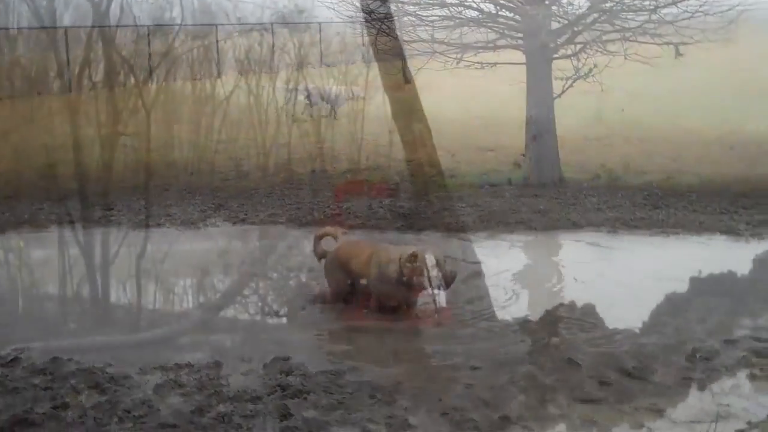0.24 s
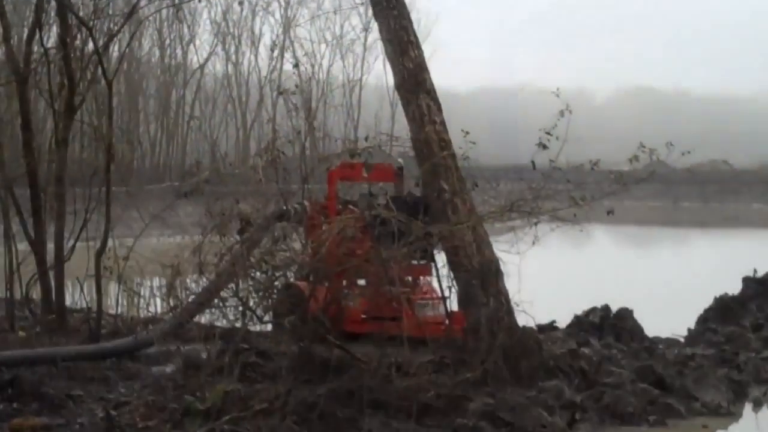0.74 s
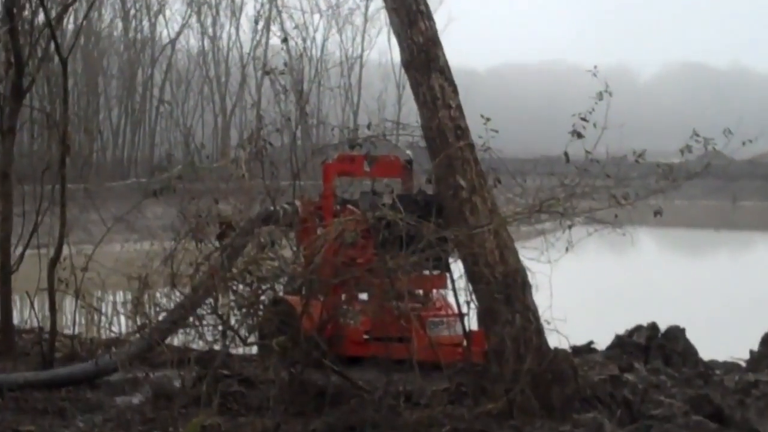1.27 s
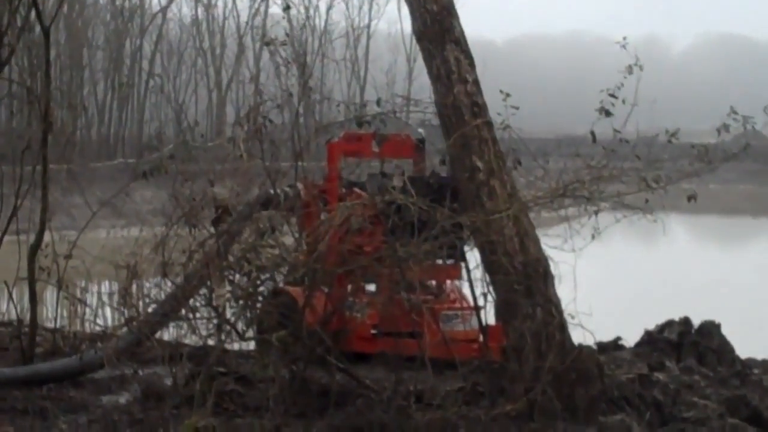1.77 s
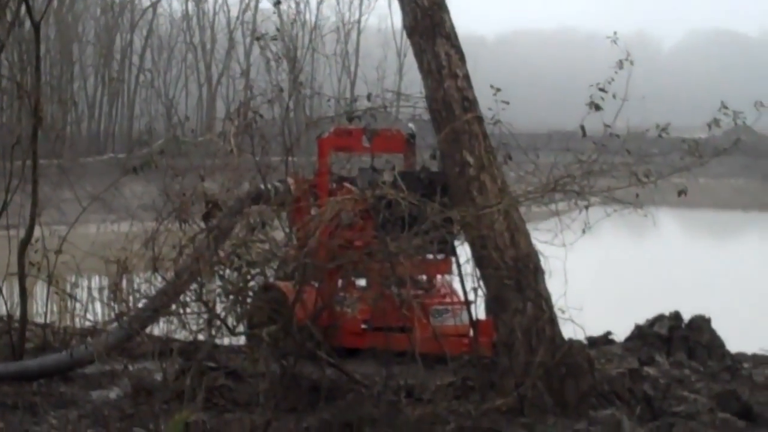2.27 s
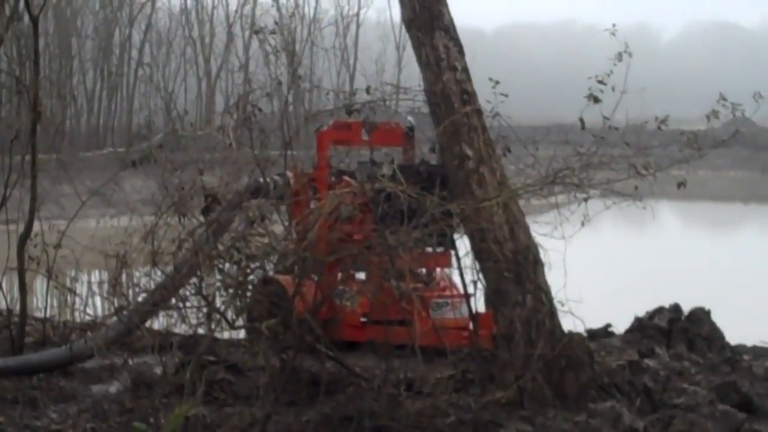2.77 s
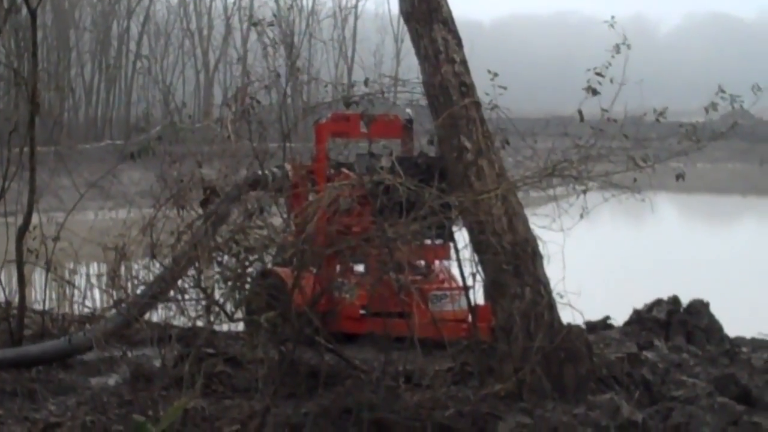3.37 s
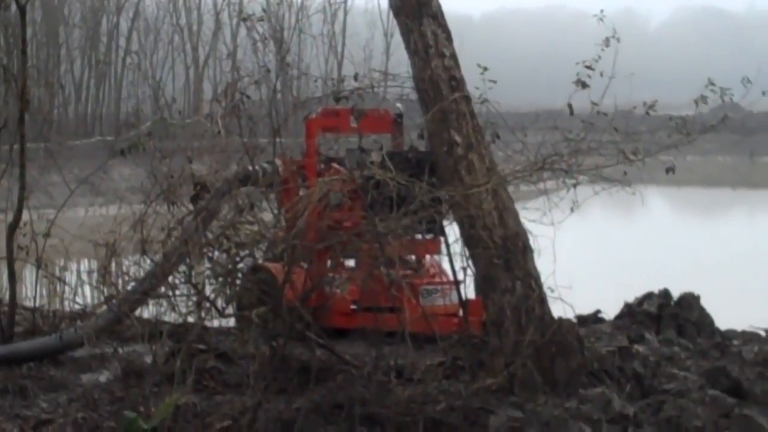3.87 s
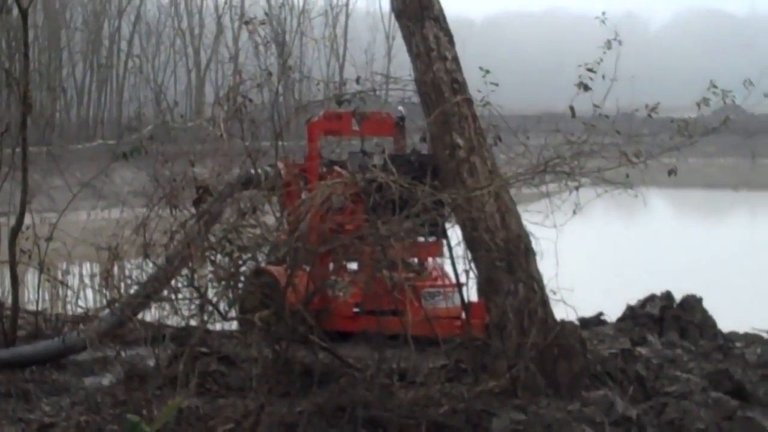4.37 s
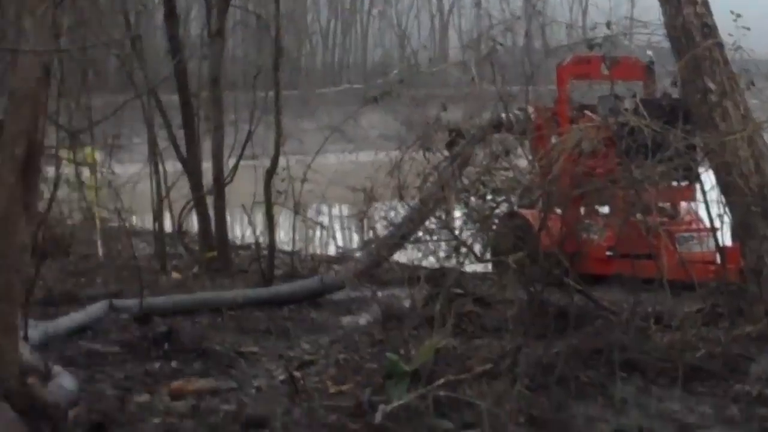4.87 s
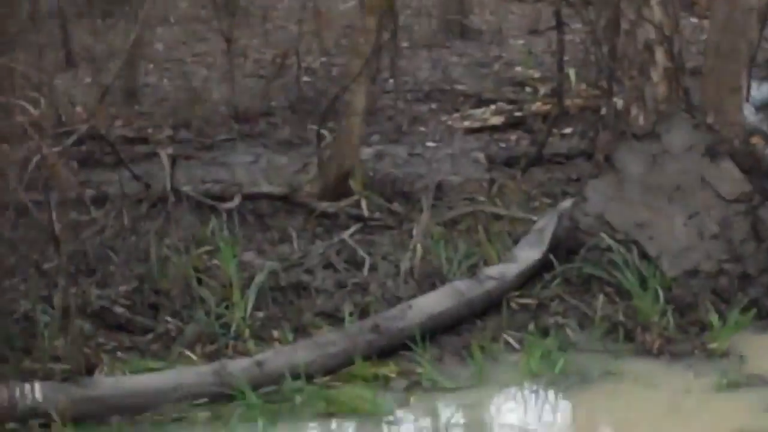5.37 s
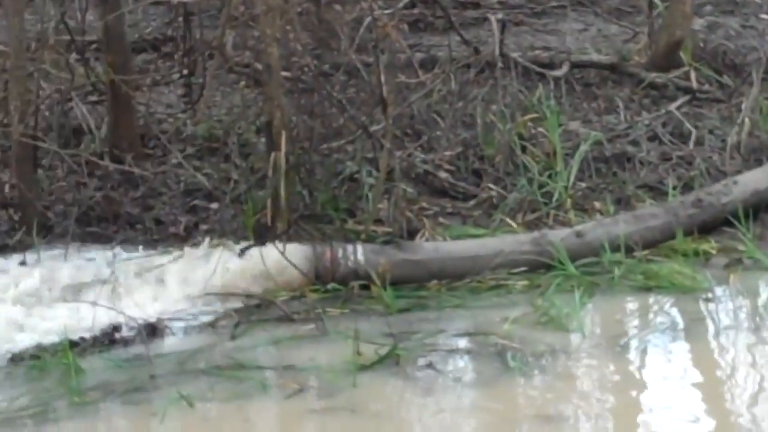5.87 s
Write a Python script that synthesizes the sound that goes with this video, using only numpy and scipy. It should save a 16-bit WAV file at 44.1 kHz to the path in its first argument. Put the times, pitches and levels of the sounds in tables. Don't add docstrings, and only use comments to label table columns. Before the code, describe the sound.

A quiet muddy puddle trickle dissolves into a clattering diesel pump beside a roaring, bubbling gush of water from a wide hose.

```python
import sys
import numpy as np
from scipy import signal
from scipy.fft import rfft, irfft, next_fast_len
from scipy.io import wavfile
from scipy.ndimage import uniform_filter1d

SR = 44100
rng = np.random.default_rng(int(sys.argv[2]) if len(sys.argv) > 2 else 0)


def wav_record(signal):
    frames = np.transpose(np.atleast_2d(signal))
    bounded = np.clip(frames, -1, 1)
    quanta = np.round(bounded * 32767).astype(np.int16)
    wavfile.write(sys.argv[1], SR, quanta)


def gain_from_db(level_db):
    decades = np.asarray(level_db, float) / 20
    return 10 ** decades


N = 270333

CYCLE_HZ, CYCLE_START = 7.9444, -.048
RIPPLE = rng.standard_normal(500)


def evened(x):
    return x / np.sqrt(np.mean(x ** 2) + 1e-20)


def read(points, hz):
    f, value = np.transpose(points)
    return np.interp(np.log(hz + 1), np.log(f + 1), value)


def add(mix, s, sound):
    part = mix[max(round(s * SR), 0):][:len(sound)]
    part += sound[:len(part)]


def coloured(x, db_of_hz):
    size = next_fast_len(len(x), real=True)
    gain = gain_from_db(db_of_hz(np.fft.rfftfreq(size, 1 / SR)))
    return irfft(rfft(x, size) * gain, size)[:len(x)]


def wander(rate_hz):
    steps = rng.standard_normal(int(N / SR * rate_hz) + 2)
    return evened(np.interp(np.arange(N) / SR * rate_hz, np.arange(len(steps)), steps))


def wash(spectrum, patchy_db, swell_db):
    frames = N // 128 + 5
    a, b, patches = rng.standard_normal((frames, 257, 3)).T
    patches = uniform_filter1d(patches, size=5, axis=0)
    patches = evened(uniform_filter1d(patches, size=12, axis=1))
    z = (a + 1j * b) * gain_from_db(patchy_db * patches)
    x = signal.istft(z, nperseg=512, noverlap=384)[1][:N]
    x = x * gain_from_db(swell_db * wander(30.))
    return evened(coloured(x, lambda hz: read(spectrum, hz)))


def grains(per_s, low_hz, high_hz, cycles, spread_db, count=14):
    struck = rng.random(N) < per_s / SR
    size = struck * gain_from_db(spread_db * np.minimum(rng.exponential(1, N), 4))
    kind = rng.integers(0, count, N)
    out = np.zeros(N)
    for k, hz in enumerate(np.geomspace(low_hz, high_hz, count)):
        turns = np.arange(int(3 * cycles * SR / hz)) * hz / SR
        rising = np.sin(2 * np.pi * turns * (1 + 0.01014 * turns))
        drop = rising * turns * np.exp(-2.5 * turns / cycles)
        out += signal.oaconvolve(size * (kind == k), drop / np.linalg.norm(drop))[:N]
    return evened(out)


def bubble(db, hz):
    t = np.arange(1500) / SR
    swell = np.minimum(t / 0.0019, 1) * np.exp(-t / 0.012)
    return gain_from_db(db) * swell * np.sin(2 * np.pi * hz * t * (1 + 0.85 * t))


def puddle():
    # frequency in Hz, level in dB per Hz.
    trickle = [(24, -58), (40, -33), (474, -12), (755, -17), (919, -6.5), (2330, -7.5), (8120, -12),
               (13900, -25)]
    # start in seconds, peak in dB, pitch in Hz.
    plops = [
        (0.021, -31, 820),
        (0.104, -38.5, 790),
        (0.154, -29, 710),
    ]
    out = wash(trickle, patchy_db=1.5, swell_db=-0.5)
    out += .5 * grains(900., 586.0, 4420.0, cycles=6.7, spread_db=-0.5)
    out *= gain_from_db(-35.5)
    for s, db, hz in plops:
        add(out, s, bubble(db, hz))
    return out


def hum():
    # multiple of the cycle rate, level in dB rms.
    clear_tones = [(8, -56), (9, -71), (11, -65), (12, -53), (13, -68), (16, -63), (20, -68), (21, -61),
                   (23, -57), (24, -59), (25, -59), (32, -57), (33, -66), (36, -65)]
    # frequency in Hz, level in dB per Hz.
    silencer = [(100, -47), (145, 8.5), (170, 8.5), (215, 6.0), (250, -32), (600, -50)]
    puff_turn = .97
    turns = CYCLE_START + CYCLE_HZ * np.arange(N) / SR - puff_turn

    def lead(k):
        if k > 20:
            return -.2
        return .05 if k % 4 else -.12 + .033 * (k - 12)

    orders = {k: -75 for k in range(14, 38)}
    orders.update(dict(clear_tones))
    tones = np.zeros(N)
    for k, db in orders.items():
        tones += gain_from_db(db + 3) * np.cos(2 * np.pi * (k * turns + lead(k)))
    flutter = coloured(rng.standard_normal(N), lambda hz: read(silencer, hz))
    return tones * gain_from_db(0.38 * wander(4.9)) + gain_from_db(-50.5) * evened(flutter)


def casing_db(hz, ripple_db=1.25):
    # frequency in Hz, width in Hz, dB above the rest.
    panels = [(880, 110, 2.8), (1500, 100, 2.6), (590, 170, 1.8), (4027, 44, 2.1), (4393, 151, 3.2),
              (4695, 54, 3.6), (5000, 300, 3.4), (5425, 69, 3.7), (5568, 90, 3.2), (6540, 330, 2.8),
              (7173, 110, 2.6), (7507, 144, 2.2), (8690, 224, 1.6), (1940, 90, 1.5)]
    peaks = sum(db / (1 + ((hz - f) / (width / 2)) ** 4) for f, width, db in panels)
    ripple = np.interp(hz, np.arange(len(RIPPLE)) * 45., RIPPLE)
    return peaks + ripple_db * ripple * np.clip(hz / 6000, .2, 1)


def firings():
    firing_turns = [.125, .365, .6, .855]
    # knock in dB, clatter in dB, clatter delay in seconds.
    cylinders = [(-4, 0, .007), (-7, -1, .006), (-1, 0, .008), (1, 0, .007)]
    # start in seconds, peak in dB.
    bangs = [(0.749, -16), (0.8395, -28), (1.2544, -14), (1.3748, -22), (1.5394, -13.5), (2.3804, -16),
             (2.4748, -27), (3.3894, -21), (3.8916, -18), (5.024, -20), (5.5244, -17), (5.6555, -31),
             (5.9055, -27)]
    # frequency in Hz, width in Hz, level in dB.
    block = [(548, 58, -17), (628, 76, -4), (866, 129, -1), (1160, 169, -1), (1509, 161, -1),
             (1660, 62, -6), (1851, 106, -7), (1938, 55, -7), (2216, 38, -11), (2383, 244, -10),
             (2510, 96, -11), (2733, 123, -12), (2852, 43, -14), (3114, 204, -12)]
    # frequency in Hz, level in dB per Hz.
    valve_gear = [(700, -51), (1200, -6), (2000, -5.5), (2900, -2.5), (3150, -0.5), (3400, -9.5),
                  (5500, -8.5), (14000, -34.5)]
    t = np.arange(2200) / SR
    knocks, gate = np.zeros(N), np.zeros(N)
    blow_shape = np.minimum(t / .001, 1) * np.exp(-t / .004) + .3 * np.exp(-t / .03)
    blows = rng.standard_normal((len(cylinders), len(t))) * blow_shape
    chance = np.clip(rng.standard_normal((60, len(cylinders), 3)), -1.5, 1.5)
    for cycle, row in enumerate(chance):
        for turn, blow, cylinder, luck in zip(firing_turns, blows, cylinders, row):
            knock_db, clatter_db, delay = cylinder
            slip, harder, looser = luck
            s = (cycle + turn - CYCLE_START) / CYCLE_HZ
            add(knocks, s + .00008 * slip, gain_from_db(knock_db + 1.3 * harder) * blow)
            rattle = t / delay * np.exp(-(t / delay) ** 1.6)
            add(gate, s, gain_from_db(clatter_db + 1.6 * looser) * rattle)
    for s, db in bangs:
        add(gate, s, gain_from_db(db + 14.5) * np.minimum(t / 0.0076, 1) * np.exp(-t / 0.0075))
    ring = np.zeros(len(t))
    for hz, width, db in block:
        decay = np.sqrt(width) * np.exp(-np.pi * width * t)
        ring += gain_from_db(db) * decay * np.sin(2 * np.pi * hz * t)
    clatter = coloured(gate * rng.standard_normal(N), lambda hz: read(valve_gear, hz) + casing_db(hz))
    no_bass = signal.butter(3, 850, 'high', fs=SR, output='sos')
    knocks = signal.sosfilt(no_bass, signal.oaconvolve(knocks, ring)[:N])
    return gain_from_db(-33.5) * evened(knocks) + gain_from_db(-31.5) * evened(clatter)


def water():
    # frequency in Hz, level in dB per Hz.
    roar = [(115, -27), (250, -14), (620, -12), (1300, -2), (3000, -5.5), (3700, -8), (8000, -14),
            (14000, -23.5)]
    # start in seconds, peak in dB, pitch in Hz.
    gulp = (2.512, -27, 600)
    gush = gain_from_db(-24) * wash(roar, patchy_db=1.14, swell_db=0.29)
    gush += gain_from_db(-36) * grains(3000., 496.0, 4876.0, cycles=5.5, spread_db=4.0)
    add(gush, gulp[0], bubble(*gulp[1:]))
    return coloured(gush, lambda hz: 1.5 * casing_db(hz) - 1)


def scene():
    share = np.interp(np.arange(N) / SR, (-0.098, 0.91), (0, 1))
    pump = hum() + firings() + water()
    mono = share * pump + (1 - share) * puddle()
    return np.array([mono, mono])


def top_cut(x):
    return signal.sosfilt(signal.butter(12, 14070, fs=SR, output="sos"), x)


def record(dry):
    # frequency in Hz, threshold in dB.
    dropped = [(6000, -14), (9500, -6), (11500, -2.6), (12400, -1.5), (13300, -3), (13700, -2),
               (13850, 1.5)]
    ceiling, edge_hz, offset = .6, 13880, -.0009
    overloaded = ceiling * np.tanh(dry[0] / ceiling)
    hz, _, z = signal.stft(overloaded, SR, nperseg=1024, noverlap=768)
    power = uniform_filter1d(uniform_filter1d(abs(z) ** 2, size=6, axis=1), size=2, axis=0)
    usual = uniform_filter1d(uniform_filter1d(power, size=150, axis=1), size=15, axis=0)
    loudness = power.sum(0)
    usual = usual * uniform_filter1d(loudness, size=24) / uniform_filter1d(loudness, size=150)
    strong = power > usual * gain_from_db(2 * read(dropped, hz))[:, None]
    kept = strong & (hz < edge_hz)[:, None]
    limited = signal.istft(z * kept, SR, nperseg=1024, noverlap=768)[1][:N] + offset
    return top_cut(np.array([limited, limited]))


dry = scene()
out = record(dry)
wav_record(out)
```